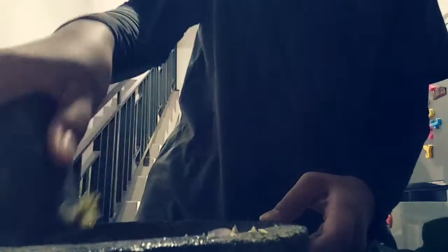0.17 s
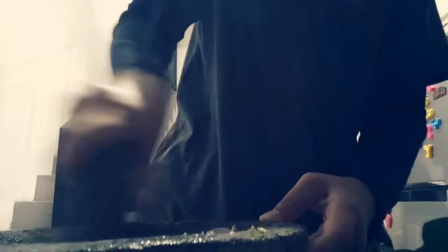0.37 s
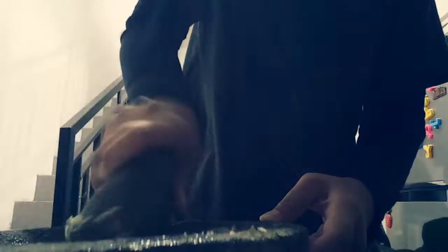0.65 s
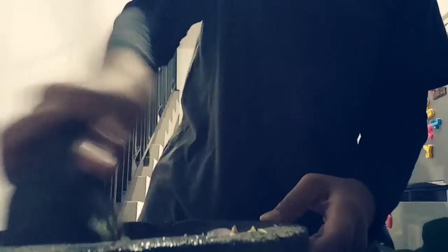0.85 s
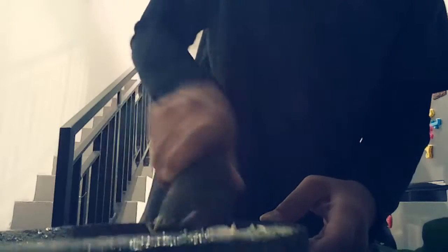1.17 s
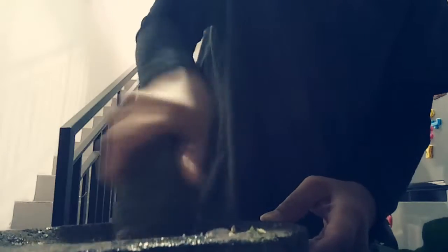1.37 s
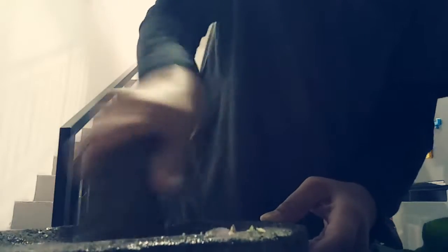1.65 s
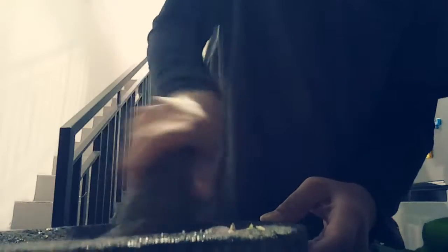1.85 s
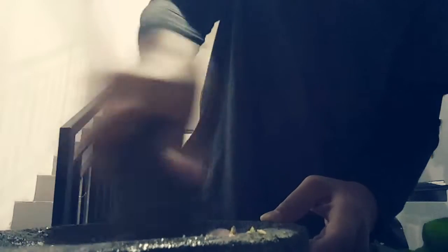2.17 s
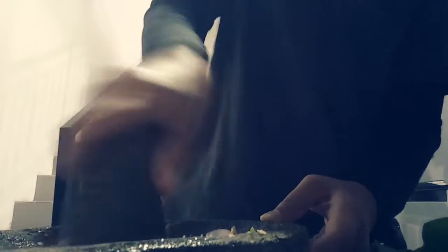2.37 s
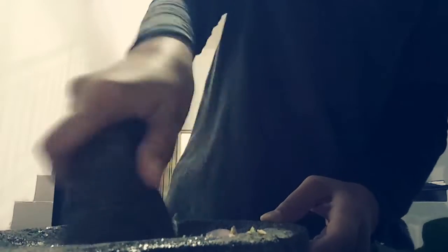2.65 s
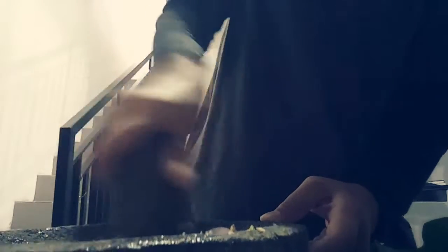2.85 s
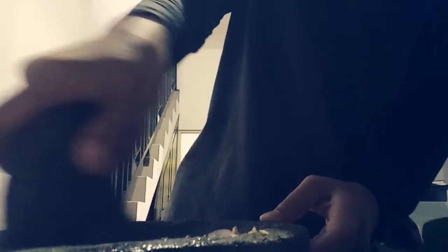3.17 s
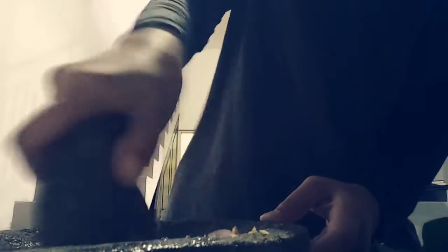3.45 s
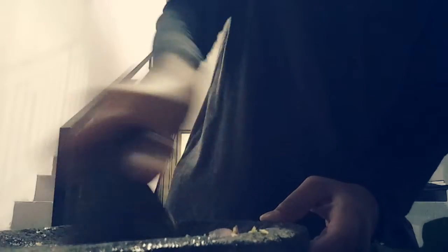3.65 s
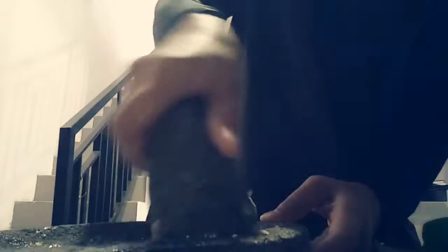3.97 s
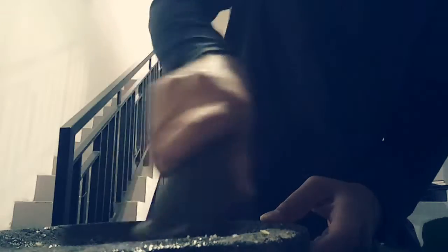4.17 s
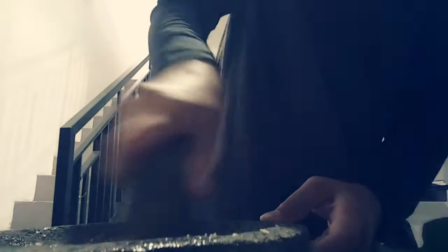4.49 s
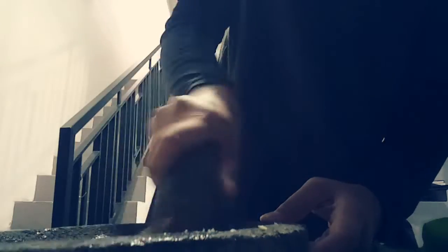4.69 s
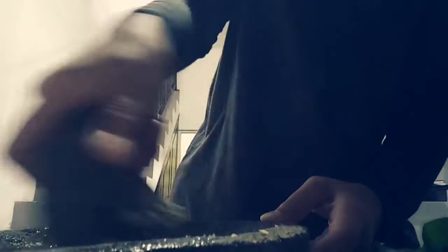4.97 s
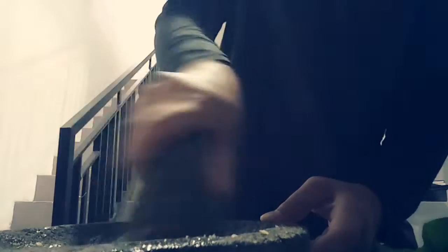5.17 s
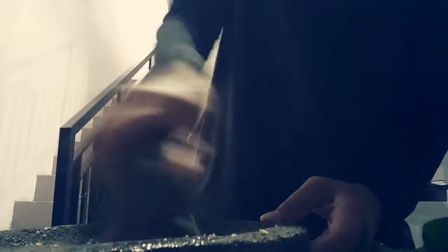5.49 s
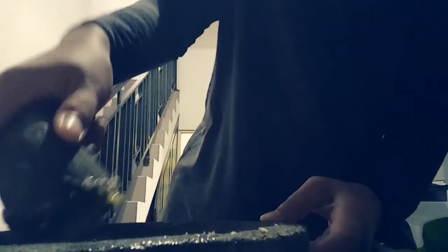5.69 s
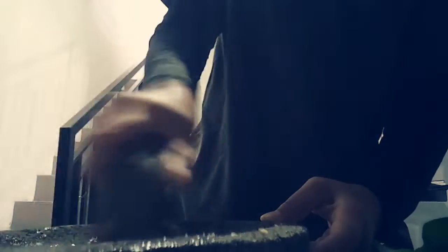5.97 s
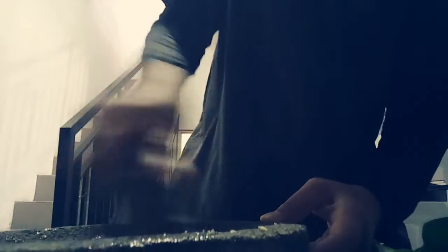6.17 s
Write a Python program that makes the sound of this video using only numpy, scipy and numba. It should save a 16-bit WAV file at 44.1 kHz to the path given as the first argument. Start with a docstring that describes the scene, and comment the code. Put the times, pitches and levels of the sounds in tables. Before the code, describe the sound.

Close to the microphone in a quiet kitchen, a stone pestle clacks into a stone mortar roughly once a second, sometimes in quick doubles. Each knock leads into a brief, rough scrape with a hollow groan of stone on stone. Between the blows, damp spices crackle and single seeds pop. A low worktop thrum and a short room echo follow the strokes, which keep going throughout.

```python
"""A hard-walled kitchen, with a stereo microphone close to a shallow stone mortar of moist spices.
About once a second the pestle is set down with a knock, rocks on its rim and is pushed across the bowl.
Stone rubs and judders on stone, the paste crackles and squelches, and single seeds burst.
The worktop booms under the mortar and the room answers every blow; faint whistles, hiss and
low room tone lie behind. The mortar is dead centre, and only the treble spreads to the sides."""
import sys
import numpy as np
from scipy import signal
from scipy.fft import rfft, irfft
from scipy.io import wavfile
from scipy.ndimage import uniform_filter1d
from numba import njit

SR = 44100
rng = np.random.default_rng(int(sys.argv[2]) if len(sys.argv) > 2 else 0)


def dump_mix(stems):
    """Bounce the given channels to the path in sys.argv[1] as a 16-bit WAV at rate SR."""
    frames = np.atleast_2d(stems).T  # one column per channel
    limited = np.clip(frames, -1, 1)  # hard clip at full scale
    pcm = np.round(limited * 32767).astype(np.int16)
    wavfile.write(sys.argv[1], SR, pcm)


N = 279153

# pestle meets mortar, four bands from low to high: (time [s], thud [dB], clack [dB], ring [dB], edge [dB])
BLOWS = [(0.4154, -26, -14.5, -22, -40), (0.5786, -24.5, -15.5, -30.5, -42.5),
         (0.913, -72, -48, -53.5, -57), (1.3118, -21, -17.5, -28.5, -43.5),
         (1.357, -32.5, -28, -38.5, -55.5), (1.398, -38, -28, -62, -63), (1.914, -59.5, -56.5, -50.5, -59),
         (2.273, -45.5, -57.5, -51, -53), (2.289, -33.5, -29, -50, -73), (2.318, -34, -31.5, -50, -56),
         (2.375, -38, -36, -44.5, -50), (2.663, -37.5, -47, -47, -66), (2.686, -40, -71, -51, -61),
         (2.952, -71, -46, -54.5, -64), (2.966, -50.5, -47, -53, -66), (3.272, -24, -15.5, -31, -38.5),
         (3.313, -31.5, -26.5, -46.5, -60.5), (3.6848, -39, -33, -45, -60.5), (3.703, -29, -33, -47, -62),
         (4.2225, -24.5, -15.5, -26.5, -38), (4.24, -39.5, -20.5, -36.5, -69), (4.266, -28, -19, -38, -46),
         (4.495, -41, -41.5, -69, -64), (4.629, -52, -56, -58, -53), (5.062, -27, -24.5, -31.5, -40.5),
         (5.072, -22, -16, -52, -46.5), (5.16, -31, -47, -46, -46), (5.173, -25.5, -20, -38, -42),
         (5.189, -32.5, -19, -43, -43.5), (5.754, -48, -42, -59, -70), (5.793, -60, -48.5, -56, -62),
         (6.092, -26, -27.5, -38, -52.5)]
# crossovers between those four bands: (frequency [Hz])
BAND_EDGES = [750, 1600, 3000]
# spectrum of stone striking stone: (frequency [Hz], level [dB])
CONTACT_SPECTRUM = [(50, -46), (90, -26.5), (170, -14.5), (300, 1.5), (600, 11), (1200, -1), (1500, -4),
                    (1800, -6.5), (2500, -9.5), (4200, -14), (5500, -21), (8000, -26), (13000, -30.5)]
# modes of mortar, pestle and worktop: (frequency [Hz], level [dB], t60 [s])
MORTAR_MODES = [(270, -12.5, 0.066), (401, -6.5, 0.24), (518.2, -6.5, 0.2), (641, -7.5, 0.08),
                (705.5, -4, 0.037), (836, -1, 0.019), (920, -8.5, 0.049), (1047, -3, 0.031),
                (1088, 7, 0.067), (1170, -7, 0.042), (1304, 4.5, 0.02), (1380, -28, .05),
                (1554, -11, 0.066), (1750, -8, 0.063), (1920, 0.5, 0.028), (1897, -14, 0.02),
                (2245, -8, 0.034), (2510, -25, 0.28), (2700, -21.5, 0.4), (2880, -26.5, 0.29),
                (3390, -32, 0.064), (4170, -20, 0.021)]
# the loosely held pestle sings on after a blow: (time [s], level [dB])
PESTLE_CLINKS = [(.416, -34), (5.062, -31.5), (5.16, -32.5), (5.186, -35.5)]
# the pestle's bending modes: (frequency [Hz], level [dB], t60 [s])
BENDING_MODES = [(1902, -2.5, 0.2), (1930, 2, 0.29), (1998, -6.5, 0.3), (3462, -8.5, 0.093),
                 (4114, -6, 0.098)]
# the pestle settles on its rim: (time [s], length [s], rumble [dB], rasp [dB], paste [dB], judder [Hz])
RIM_ROLLS = [(0.435, 0.11, -30, -28.5, -68, 415.3), (0.595, 0.21, -37, -41, -77, 290),
             (1.33, 0.061, -32.5, -32, -67, 361.6), (2.265, .1, -35, -56.5, -53.5, 363),
             (3.29, 0.095, -31, -36.5, -56, 566), (4.27, 0.17, -33.5, -35, -46, 440.5),
             (5.09, 0.14, -32.5, -38, -56.5, 412), (5.2, 0.098, -34.5, -38.5, -48, 414),
             (6.09, 0.034, -34, -39.5, -49, 529)]
# short rustles, mostly the pestle's pushes; the one at 4.181 s is a faint rustle just before the knock:
# (time [s], length [s], rumble [dB], paste [dB], rocking [dB], judder [Hz])
RUSTLES = [(0.0, 0.04, -34, -46.5, -37.5, 463), (0.127, 0.035, -48, -46.5, -55, 470),
           (0.506, 0.036, -45, -48.5, -38.5, 422), (0.681, 0.027, -42.5, -52, -60.5, 380),
           (0.835, .14, -44.5, -54.5, -51.5, 321), (1.389, 0.0253, -35, -54, -33, 335),
           (1.434, 0.16, -42, -52.5, -52, 430), (1.664, 0.05, -50, -51.5, -43.5, 250),
           (1.791, 0.13, -43.5, -53, -62, 383.5), (2.33, 0.11, -46.5, -47.5, -42.5, 385),
           (2.548, 0.051, -40.5, -51.5, -41, 315), (2.648, 0.056, -37.5, -46.5, -42, 409.6),
           (2.731, 0.18, -50.5, -58, -65, 287.5), (2.923, 0.085, -44.5, -52.5, -49, 350),
           (3.397, .06, -40, -49, -47, 508.6), (3.521, 0.079, -43.5, -51, -52, 500),
           (3.663, 0.044, -34, -48, -44, 454.4), (3.786, 0.14, -49.5, -50.5, -56.5, 340),
           (3.969, 0.012, -68, -64, -92.5, 385), (4.181, 0.018, -45.5, -52.5, -51, 305.3),
           (4.456, 0.1, -41, -56, -43.5, 462), (4.579, 0.067, -45.5, -47.5, -48, 394),
           (4.707, 0.054, -47.5, -57, -46, 450), (5.301, 0.058, -41.5, -53, -42, 481),
           (5.423, .075, -43.5, -46.5, -73, 351), (5.542, 0.084, -44.5, -53, -54, 330),
           (5.685, 0.053, -47, -45, -74, 318), (5.807, 0.085, -42.5, -53, -66, 318),
           (6.145, .055, -42.5, -52.5, -40.5, 497), (6.248, 0.054, -46, -50, -42, 400)]
# spectrum of stone rubbing stone: (frequency [Hz], level [dB])
RASP_SPECTRUM = [(40, -32.5), (90, -10), (150, -1), (330, -11.5), (700, 9), (1200, 2.5), (2000, -6),
                 (3000, -27), (5000, -34.5)]
# the pestle rolls over its heel: (time [s], level [dB], pitch [Hz])
HEEL_GROANS = [(0.591, -20.5, 284.4), (0.923, -37, 279.4), (1.333, -30, 264), (2.382, -30.5, 336.4),
               (2.614, -30.5, 327), (2.954, -31.5, 340), (3.726, -47.5, 235), (4.266, -24, 395),
               (5.076, -20, 396.6), (5.187, -22, 384), (5.756, -32.5, 304), (5.79, -34.5, 310),
               (6.099, -30, 398)]
# spectrum of snapping husks and seeds: (frequency [Hz], level [dB])
SNAP_SPECTRUM = [(1000, -35.5), (2000, -5), (3000, -4.5), (3700, 3), (4500, 9.5), (5300, -7.5), (6600, 1.5),
                 (8200, -8.5), (10000, -4), (12000, -20), (13500, -23.5)]
# pockets in the paste that a crack can ring: (frequency [Hz], level [dB])
PASTE_POCKETS = [(3500, -0.5), (4000, -1), (4550, -7), (5600, -5.5), (6500, -3.5), (7600, -15),
                 (9700, -11.5), (11300, -18)]
# seeds and fibres bursting: (time [s], level [dB], pitch [Hz], shell tick over the snap [dB])
SEED_BURSTS = [(0.0138, -41, 4650, -7), (0.0297, -34.5, 4240, -10.5), (0.1557, -42.5, 4060, 6),
               (0.185, -41, 6660, 2.5), (0.969, -43, 6530, 2), (1.4016, -37.5, 3880, -15),
               (2.6498, -39, 3810, 0.5), (2.7717, -46.5, 3430, 6), (2.827, -44.5, 4370, 5.5),
               (2.864, -36, 4600, -6), (3.5759, -38.5, 4340, -6.5), (3.829, -38.5, 4460, 8.5),
               (3.922, -42.5, 6570, 4), (4.325, -35, 3920, -17.5), (4.5964, -43, 3630, -12),
               (4.6314, -39.5, 4620, -12), (4.684, -47, 6460, -6), (4.7322, -35, 4260, 1.5),
               (5.4369, -42.5, 3770, -9), (5.5584, -36, 6900, 1), (5.5738, -35.5, 3430, 2),
               (5.6912, -36, 4360, -17), (5.795, -44, 4400, -16), (5.84, -40, 4400, -1),
               (6.3058, -35, 4260, -19)]
# short fizzes, mostly of juice; the one at 3.252 s is a brief high fizz just before the knock:
# (time [s], level [dB], pitch [Hz], length [s])
FIZZES = [(0.683, -43.5, 3600, 0.052), (0.835, -49, 3500, 0.048), (1.46, -44, 3760, 0.1),
          (1.789, -47, 3640, 0.043), (2.549, -38, 4060, 0.048), (3.252, -36, 4300, 0.021),
          (3.567, -43, 3600, 0.029), (4.629, -30, 2590, 0.012), (5.43, -35.5, 4030, 0.038)]
# the kitchen's reverberation by band: (frequency [Hz], level [dB], t60 [s])
REVERB_BANDS = [(98.9, 0, 0.48), (246.6, -17, 0.47), (557, -9.5, 0.4), (1167, -7.5, 0.24), (1960, -8, 0.27),
                (3894, -14, 0.78), (7950, -10.5, 0.11), (12920, -14.5, 0.24)]
# standing waves between the walls: (frequency [Hz], level [dB], t60 [s])
KITCHEN_MODES = [(88.7, -30, 0.21), (143.9, -46.5, 0.93), (199.8, -44, 0.91), (268.4, -36, 0.3),
                 (415.5, -53, 0.94)]
# dips and peaks where the microphone stands among the reflections: (frequency [Hz], gain [dB])
MIC_POSITION = [(120, -3.5), (165, -1), (200, 3), (280, 0), (315, -4), (345, -4.5), (380, 1.5), (450, 3),
                (520, -2), (555, -1), (600, 0), (700, 1), (800, -5), (1250, -1.5), (1360, 0), (1600, -0.5)]
# share of the treble that spreads sideways: (frequency [Hz], gain [dB])
SIDE_SHARE = [(4400, -11), (5200, -8), (6000, -3), (8000, -3), (10000, -3), (12500, 0)]
# thin whistles in the pauses: (time [s], level [dB], pitch [Hz], length [s])
FAINT_WHISTLES = [(0.25, -76, 5780, 0.19), (1.005, -81, 5740, 0.18), (1.012, -79, 2800, 0.12)]
# spectrum of the background hiss: (frequency [Hz], level [dB])
HISS_SPECTRUM = [(2800, -35), (3400, -14.5), (3700, -2), (4750, -1), (5100, -20), (6000, -48)]
# slow rise and fall of that hiss: (time [s], level [dB])
HISS_LEVELS = [(0, -76), (1.3, -87), (2.1, -78), (4.1, -74.5), (5.0, -74), (6.33, -75)]
# spectrum of the quiet kitchen: (frequency [Hz], level [dB])
ROOM_TONE_SPECTRUM = [(25, -2.5), (60, -15), (94, 19.5), (130, 9.5), (250, -3.5), (500, -11), (1200, -20),
                      (2100, -20), (3200, -22.5), (4300, -22.5), (5100, -29), (6000, -26), (7000, -34),
                      (13000, -38)]


def knocks(cushion_s=0.00009, clatter_db=-20, clatter_s=0.012, chatter_db=-34, chatter_s=0.0032,
           ring_db=-13, spot_db=2, detune=0.013, band_trim_db=(-1, 0, -3, 0)):
    """Each blow meets the stone and chatters on grit for some ms, which drives the stone's modes."""
    out, lead = np.zeros(N), SR // 100
    stone = ring(MORTAR_MODES, length_s=0.25)
    t = np.arange(len(stone)) / SR
    contact = t * np.exp(-t / cushion_s)  # the paste cushions the blow into a short push
    contact /= contact.sum()
    for s, *band_db in BLOWS:
        grains = rng.standard_normal(len(t))
        crack = colour(contact + undb(clatter_db) * grains * np.exp(-t / clatter_s), CONTACT_SPECTRUM)
        # each spot of the bowl favours other modes and loads them differently
        spot = np.array(MORTAR_MODES, float)
        spot[:, 1] += spot_db * rng.standard_normal(len(spot))
        spot[:, 0] *= 1 + detune * rng.standard_normal(len(spot))
        drive = contact + undb(chatter_db) * grains * np.exp(-t / chatter_s)
        tone = signal.fftconvolve(drive, ring(spot, length_s=0.25))[:len(t)] / np.abs(stone).max()
        bands = split(np.pad(crack + undb(ring_db) * tone, (lead, 0)), BAND_EDGES)
        # the cushion of paste and the spot that is hit set the weight of each band
        attack_rms = np.sqrt(uniform_filter1d(bands ** 2, size=350, axis=1).max(axis=1))
        weights = undb(np.add(band_db, band_trim_db)) / attack_rms
        add(out, s - lead / SR, weights @ bands)
    return out


def clinks():
    """Where the grip is loose the pestle rings a little longer than the bowl."""
    out, tone = np.zeros(N), ring(BENDING_MODES, length_s=0.4)
    for s, db in PESTLE_CLINKS:
        add(out, s, undb(db) * tone)
    return out


def rubbing(rumble_db=-5, rasp_db=-3, rustle_rasp_db=-10, ring_db=-29, judder_db=11):
    """Rough stone jolts over rough stone and shakes the bowl; the grip sets the pitch of the judder."""
    jolts = grit(per_s=1300, spread_db=1, bunch_hz=68.37, bunch_db=4)
    bowl = signal.fftconvolve(jolts, ring(MORTAR_MODES, length_s=0.18))[:N]
    judder = resonate(jolts, judder_pitch(RIM_ROLLS + RUSTLES), q=1.5)
    body = colour(jolts, RASP_SPECTRUM) + undb(ring_db) * bowl + undb(judder_db) * judder
    low, high = split(body, BAND_EDGES[:1])
    rustle = strokes(RUSTLES, column=2, attack_s=0.041, sag_db_per_s=26.5, release_s=0.05)
    rumble = unit(low) * (rolling(column=2) + rustle)
    rasp = unit(high) * (rolling(column=3) + undb(rustle_rasp_db) * rustle)
    return undb(rumble_db) * rumble + undb(rasp_db) * rasp


def judder_pitch(moves):
    """The judder glides from the pitch of one move to that of the next."""
    middle_s, hz = np.transpose(sorted((s + length_s / 2, hz) for s, length_s, *_, hz in moves))
    return np.interp(np.arange(N) / SR, middle_s, hz)


def strokes(moves, column, attack_s, sag_db_per_s, release_s):
    """Gain from one level column: each move builds up, eases off while it lasts and dies away."""
    gain, t = np.zeros(N), np.arange(SR) / SR
    for move in moves:
        s, length_s = move[:2]
        attack = np.minimum(t / attack_s, 1)
        release = np.exp(-np.maximum(t - length_s, 0) / release_s)
        add(gain, s, undb(move[column] - sag_db_per_s * t) * attack * release)
    return gain


def rolling(column):
    """Gain of one layer while the pestle settles on its rim."""
    return strokes(RIM_ROLLS, column, attack_s=0.008, sag_db_per_s=71, release_s=0.06)


def groans(trim_db=-2, swell_s=0.01, waver=0.06):
    """A hollow groan: a few cycles of stick and slip swell and die, slightly unsteady in pitch."""
    out, t = np.zeros(N), np.arange(SR // 7) / SR
    swell = t / swell_s * np.exp(1 - t / swell_s)
    for s, db, hz in HEEL_GROANS:
        drift = unit(uniform_filter1d(rng.standard_normal(len(t)), size=300))
        tone = np.sin(2 * np.pi * np.cumsum(hz * (1 + waver * drift)) / SR)
        add(out, s, undb(db + trim_db) * tone * swell)
    return out


def crushing(trim_db=-2.5, squash=0.047):
    """Dry husks snap across the treble; moist cells ring pockets whose pitch shifts as they squash."""
    husks = unit(colour(grit(per_s=900, spread_db=6, bunch_hz=60, bunch_db=4.5), SNAP_SPECTRUM))
    cells = np.zeros(N)
    for hz, db in PASTE_POCKETS:
        pops = grit(per_s=420, spread_db=4.5, bunch_hz=30, bunch_db=6.5)
        bend = np.clip(1 + squash * wander(per_s=16), 0.5, 1.5)
        cells += undb(db) * resonate(pops, hz * bend, q=17.0)
    rustle = strokes(RUSTLES, column=3, attack_s=0.04, sag_db_per_s=9, release_s=0.042)
    return undb(trim_db) * unit(husks + unit(cells)) * (rolling(column=4) + rustle)


def seeds(trim_db=1, snap_s=0.014, focus_db=4, shell_s=0.0016):
    """A seed's shell cracks with a bright tick, and the seed bursts with a short snap."""
    out, t = np.zeros(N), np.arange(SR // 20) / SR
    shell_spectrum = [(2500, -28.5), (4000, -3.5), (6500, 7), (10500, -1), (13000, -8)]
    for s, db, hz, shell_db in SEED_BURSTS:
        grains = rng.standard_normal(len(t))
        burst = colour(grains * np.exp(-t / snap_s), SNAP_SPECTRUM)
        snap = colour(burst, [(hz / 2, 0), (hz, focus_db), (hz * 2, 0)])
        shell = colour(grains * np.exp(-t / shell_s), shell_spectrum)
        seed = snap / np.abs(snap).max() + undb(shell_db) * shell / np.abs(shell).max()
        add(out, s, undb(db + trim_db) * seed)
    return out


def fizzes(trim_db=-1):
    """Brief high fizzes, most of them tiny bubbles ringing in the wet gap as it closes."""
    out = np.zeros(N)
    for s, db, hz, length_s in FIZZES:
        size = int(length_s * SR)
        fizz = resonate(rng.standard_normal(SR)[:size], np.full(size, float(hz)), q=13.0)
        fizz *= signal.windows.tukey(size)
        add(out, s, undb(db + trim_db) * fizz / np.abs(fizz).max())
    return out


def worktop(trim_db=-1, roll_db=-7):
    """The worktop booms at its lowest resonance as the mortar rocks on it."""
    boom = narrow_noise(N, hz=92, q=4.4)
    boom /= np.sqrt(uniform_filter1d(boom ** 2, size=8000))  # steadied, so the strokes set the level
    rocking = strokes(RUSTLES, column=4, attack_s=0.066, sag_db_per_s=6, release_s=0.034)
    return undb(trim_db) * boom * (rocking + undb(roll_db) * rolling(column=2))


def wall_echoes(x, build_s=0.0019):
    """Dense echoes off hard walls build up quickly and die first in the high treble."""
    hz, db, t60 = np.transpose(REVERB_BANDS)
    t = np.arange(SR) / SR
    bands = split(rng.standard_normal(SR), np.sqrt(hz[1:] * hz[:-1]))
    fades = np.exp(-np.log(1000) * t / t60[:, None]) * (1 - np.exp(-t / build_s))
    fades /= np.sqrt(np.sum(fades ** 2, axis=1, keepdims=True))
    return signal.fftconvolve(x, undb(db) @ (bands * fades))[:N]


def room_boom(x, gain_db=-15):
    """The kitchen's standing waves ring on after every blow."""
    return undb(gain_db) * signal.fftconvolve(x, ring(KITCHEN_MODES, length_s=1.0))[:N]


def whistles():
    """Narrow, airy tones swell and fade between strokes."""
    out = np.zeros(N)
    for s, db, hz, length_s in FAINT_WHISTLES:
        tone, size = unit(narrow_noise(SR, hz, q=22.0)), int(length_s * SR)
        add(out, s, undb(db) * tone[:size] * signal.windows.tukey(size))
    return out


def hiss():
    """A faint band of hiss slowly comes and goes."""
    s, db = np.transpose(HISS_LEVELS)
    gain = undb(np.interp(np.arange(N) / SR, s, db))
    return gain * unit(colour(rng.standard_normal(N), HISS_SPECTRUM))


def room_tone():
    """The steady low murmur of the quiet kitchen."""
    return undb(-61) * unit(colour(rng.standard_normal(N), ROOM_TONE_SPECTRUM))


def grit(per_s, spread_db, bunch_hz, bunch_db):
    """Tiny clicks of unequal size, bunched as the stone catches and slips; rms near 1."""
    sizes = undb(spread_db * np.minimum(rng.exponential(size=N), np.pi)) * rng.choice([-1, 1], N)
    catch = undb(bunch_db * wander(bunch_hz))
    clicks = (rng.random(N) < per_s / SR) * sizes * catch
    return clicks / np.sqrt(uniform_filter1d(clicks ** 2, size=SR // 10) + 1e-9)


def ring(modes, length_s):
    """Damped modes after a blow."""
    hz, db, t60 = np.transpose(modes)[:, :, None]
    t = np.arange(int(length_s * SR)) / SR
    return np.sum(undb(db) * np.exp(-np.log(1000) * t / t60) * np.sin(2 * np.pi * hz * t), axis=0)


def narrow_noise(size, hz, q):
    """Noise passed twice through one resonance."""
    centre = np.full(size, float(hz))
    return resonate(resonate(rng.standard_normal(size), centre, q), centre, q)


@njit
def resonate(x, hz, q):
    """State-variable band-pass with a moving centre, gain 1 there."""
    y, band_state, low_state = np.empty(len(x)), 0., 0.
    for i in range(len(x)):
        g = np.tan(np.pi * hz[i] / SR)
        band = (band_state + g * (x[i] - low_state)) / (1 + g * (g + 1 / q))
        band_state = 2 * band - band_state
        low_state += 2 * g * band
        y[i] = band / q
    return y


def colour(x, points, size=4096):
    """Causal filter through the given (frequency [Hz], gain [dB]) points."""
    hz, db = np.transpose(points)
    bin_hz = np.fft.rfftfreq(size, 1 / SR) + 1
    log_gain = np.log(undb(np.interp(np.log(bin_hz), np.log(hz), db)))
    cepstrum = irfft(log_gain)[:size // 2]
    cepstrum[1:] *= 2  # minimum phase
    impulse = irfft(np.exp(rfft(cepstrum, size)))
    return signal.fftconvolve(x, impulse)[:len(x)]


def split(x, edges_hz):
    """Adjacent bands that add up to x."""
    low_passes = [signal.butter(N=4, Wn=hz, fs=SR, output="sos") for hz in edges_hz]
    lows = [signal.sosfiltfilt(sos, x, padtype=None) for sos in low_passes]
    return np.diff([0 * x, *lows, x], axis=0)


def wander(per_s):
    """Random drift with a spread near 1."""
    return np.interp(np.arange(N) / SR * per_s, np.arange(N), rng.standard_normal(N))


def add(track, s, sound):
    """Mix a sound into a track at time s."""
    i = max(int(s * SR), 0)
    track[i:i + len(sound)] += sound[:max(N - i, 0)]


def undb(db):
    """Decibels to gain."""
    return 10 ** (np.asarray(db) / 20)


def unit(x):
    """Scale to rms 1."""
    return x / np.sqrt(np.mean(x ** 2))


def scene(scatter_db=-5, side_tone_db=-10, spread_hz=4350):
    """The mortar stands close in front of the microphone; only the treble spreads to the sides."""
    crackle = crushing()
    direct = knocks() + clinks() + rubbing() + groans() + crackle + fizzes() + seeds()
    mid_tone, side_tone = room_tone(), room_tone()
    at_mic = colour(direct + wall_echoes(direct) + room_boom(direct), MIC_POSITION)
    mid = at_mic + worktop() + whistles() + hiss() + mid_tone
    # the rim and the hand scatter the crackle sideways within a few ms
    scatter = rng.standard_normal(SR // 60) * np.linspace(1, 0, SR // 60) ** 2
    scattered = signal.fftconvolve(crackle, scatter / np.linalg.norm(scatter))[:N]
    spread = wall_echoes(direct) + undb(scatter_db) * scattered + undb(side_tone_db) * side_tone
    treble_only = signal.butter(N=24, Wn=spread_hz, btype="high", fs=SR, output="sos")
    side = signal.sosfilt(treble_only, colour(spread, SIDE_SHARE))
    return np.array([mid + side, mid - side])


def record(dry, low_cut_hz=66, top_hz=13200):
    """The small microphone loses the deep bass; the recorder cuts the top."""
    thin = signal.sosfilt(signal.butter(N=4, Wn=low_cut_hz, btype="high", fs=SR, output="sos"), dry)
    return signal.sosfilt(signal.ellip(N=10, rp=0.2, rs=80, Wn=top_hz, fs=SR, output="sos"), thin)


dry = scene()
out = record(dry)
dump_mix(out)
```